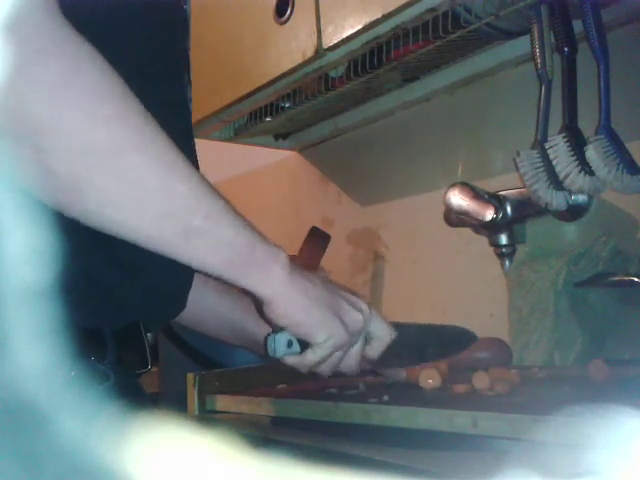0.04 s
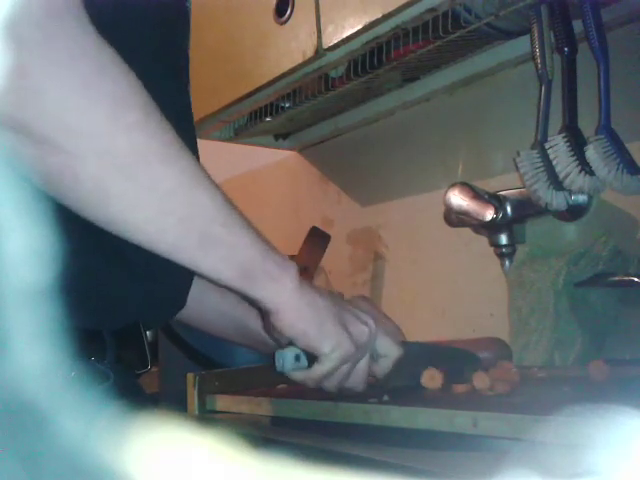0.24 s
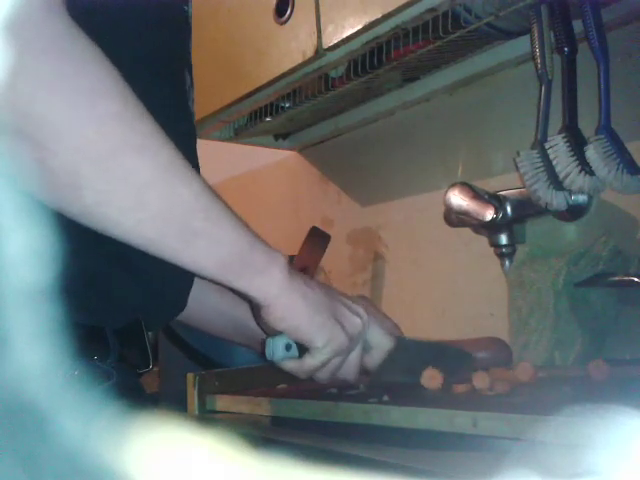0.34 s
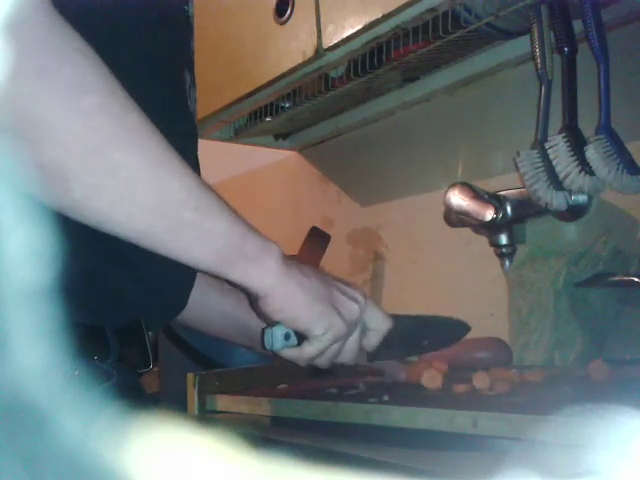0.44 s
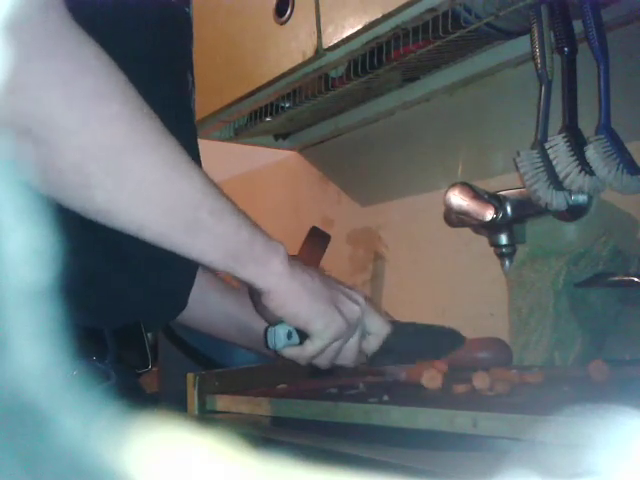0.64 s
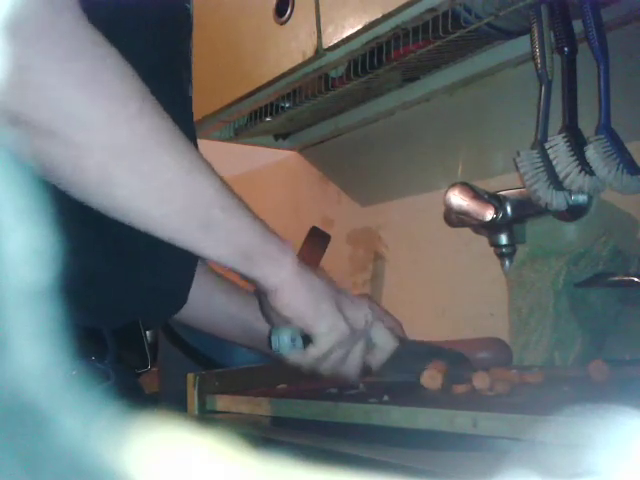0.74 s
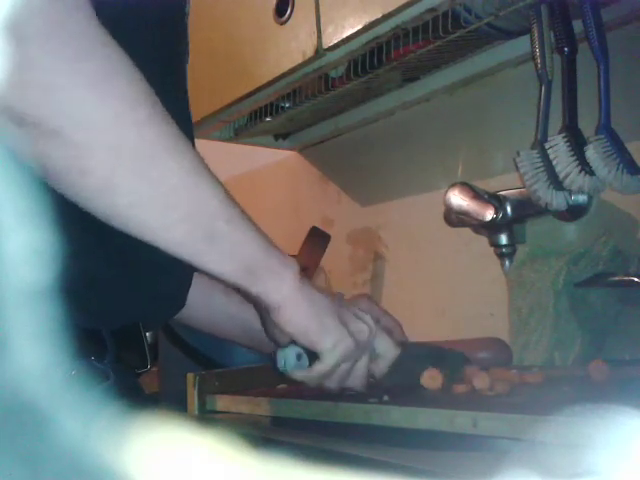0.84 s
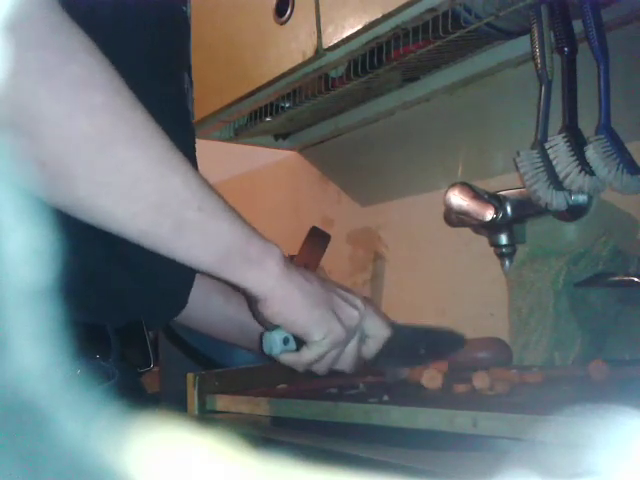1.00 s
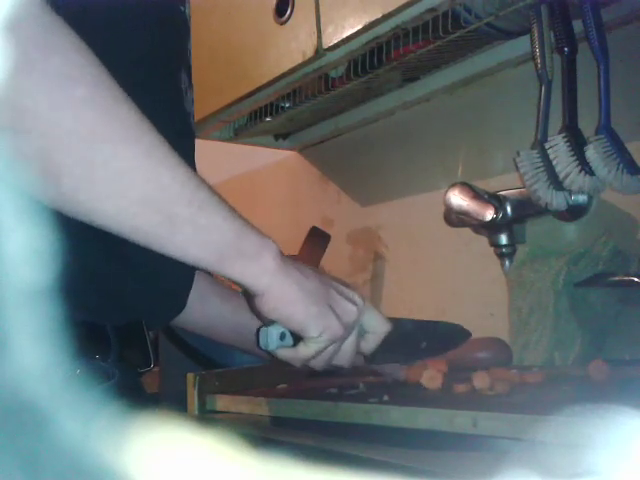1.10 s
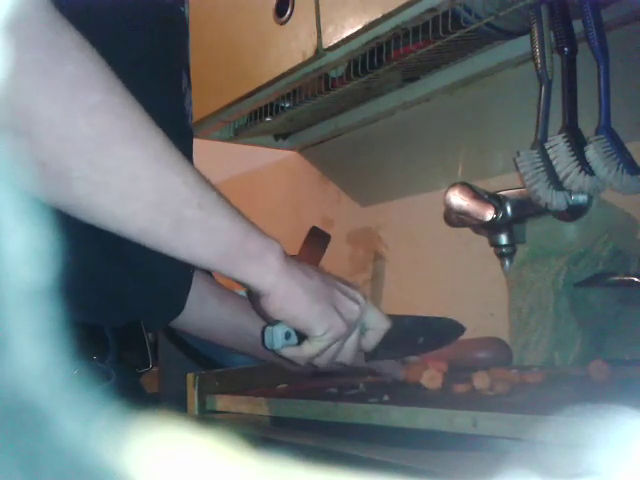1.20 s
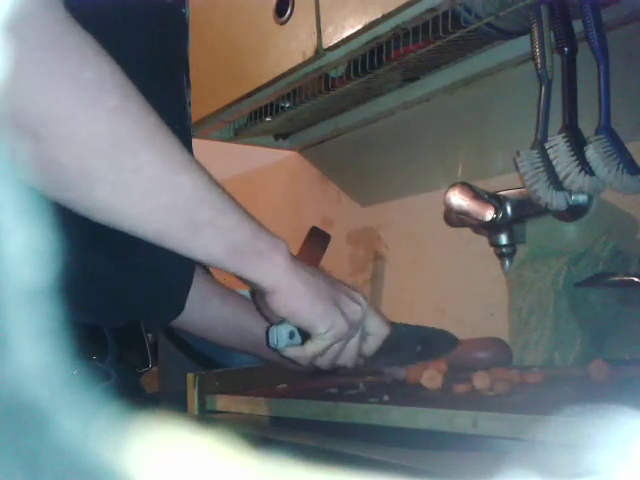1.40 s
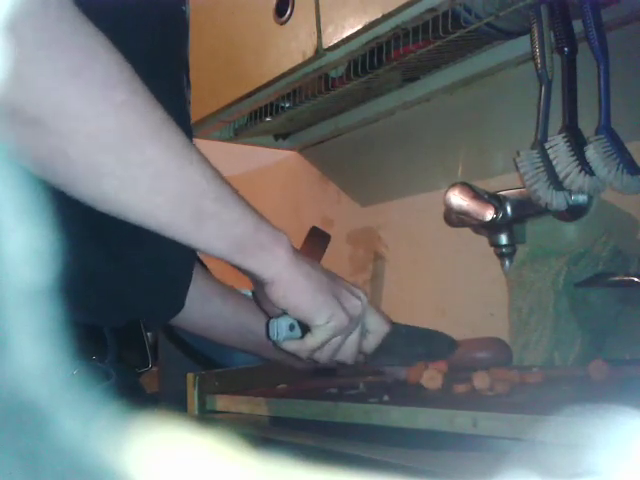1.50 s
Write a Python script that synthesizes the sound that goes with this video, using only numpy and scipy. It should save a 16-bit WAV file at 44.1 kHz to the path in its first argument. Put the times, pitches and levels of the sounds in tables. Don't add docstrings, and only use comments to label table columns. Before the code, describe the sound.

A knife chops carrot twice on a wooden board, each a crisp crunch into a loud woody knock, with faint scrapes and taps between, close in a small reverberant kitchen over very quiet hiss.

```python
import sys
import numpy as np
from scipy import signal
from scipy.io import wavfile

SR = 44100
rng = np.random.default_rng(int(sys.argv[2]) if len(sys.argv) > 2 else 0)


def wrap_up_sound(samples):
    columns = np.atleast_2d(samples).T
    tamed = np.clip(columns, -1, 1)
    steps = np.round(tamed * 32767).astype(np.int16)
    wavfile.write(sys.argv[1], SR, steps)


def linear_from_db(decibels):
    return 10 ** (np.asarray(decibels, float) / 20)


N = 68355
LEAD_S = 0.4

CHOP_S = [
    -.25,
    .2259,
    .8301,
]
CHOP_DB = [-9, -8.5, -8.5]
# pitch in Hz, level in dB, T60 in seconds.
BOARD = [(280, -19, 0.041), (666.4, -0.5, 0.02), (815, -9, 0.038), (1095, -10.5, 0.05), (1387, -7.5, 0.075),
         (2035, -9, 0.033), (2500, -6, 0.017), (3274, -9.5, .015), (3710, -8, 0.023), (4180, -3.5, 0.005),
         (4790, -8.5, 0.045), (5820, -8.5, 0.0043)]
COUNTER_HZ = [80, 140, 232, 385, 454, 542, 584, 738, 794, 1085, 1134, 1299, 1420, 1881]
# level in dB, T60 in seconds.
COUNTER_RINGS = [(-21, .3), (-17.5, 0.24), (-25, .42), (-29, 0.32), (-12.5, .21), (-16.5, 0.35),
                 (-20.5, 0.43), (-24, .22), (-27.5, .22), (-26, .28), (-21.5, 0.2), (-33, 0.094),
                 (-25.5, .25), (-13.5, .3)]
# pitch in Hz, level in dB, T60 in seconds.
RACK = [(3590, -29, .2), (3730, -26, .24), (3790, -24, .25), (3845, -23, .25), (3920, -26, .22),
        (4140, -28, .18), (4750, -30, .18)]
# start in seconds, end in seconds, start level in dB, end level in dB.
CRUNCHES = [
    (0.202, 0.216, -54.5, -40),
    (0.218, 0.232, -32.5, -35.5),
    (0.802, 0.823, -52, -38),
    (.8205, 0.836, -35, -31),
]
SCRAPE_S = [.1, .135, .16, .174, .673, .684, .75, .7655, .783, 1.421, 1.435, 1.489]
SCRAPE_LENGTH_S = [.012, .022, .014, .012, .006, .025, .015, .016, .018, .01, .015, .015]
# level in dB, brightness in dB per octave.
SCRAPE_TONE = [(-59, -0.3), (-60.5, -5), (-62, 1), (-55, 1), (-55, -1.5), (-72, -3.5), (-67, 2.5),
               (-54, -4), (-65.5, -1), (-62, -1.5), (-71, -1), (-72.5, 0.6)]
BLADE_HZ = [3250, 4350, 4750, 5200, 6250, 9000, 14000]
# width in Hz, level in dB.
BLADE_SHAPE = [(251, 0.5), (220, -2.5), (250, -5), (4500, -3), (350, -2.5), (3500, -11.5), (3000, -10)]
# start in seconds, length in seconds, level in dB.
SLIDES = [(0.093, 0.13, -63), (0.169, 0.064, -56.5), (0.546, 0.054, -66.5), (0.676, 0.053, -63.5),
          (0.769, 0.11, -52), (1.418, 0.031, -73.5), (1.478, 0.038, -69.5)]
# time in seconds, level in dB, pitch in Hz.
TAPS = [(.092, -62, 424), (.17, -48.5, 648), (.183, -63.5, 405), (.212, -36, 690), (.553, -55.5, 526),
        (.566, -57.5, 489), (.59, -50.5, 520), (.6, -78, 505), (.775, -50, 623.4), (.79, -71, 450),
        (.817, -67.5, 700), (1.44, -67, 570), (1.49, -57, 556), (1.51, -70, 500)]
# time in seconds, level in dB, pitch in Hz.
THUDS = [(.113, -49.5, 81.4), (.14, -56.5, 95), (.175, -62, 88.3), (.689, -40, 100), (.712, -53, 190),
         (.742, -54, 100), (.762, -54, 93.5), (1.49, -59, 69.1)]
# delay in seconds, level in dB.
ECHOES = [(.001, -2.5), (.0023, -11), (.0043, 0), (.0064, -9.5), (.0105, -2), (.0185, -4.5), (.028, -9)]
# frequency in Hz, level in dB per Hz.
TAIL_COLOUR = [(45, -23.5), (236, -13), (560, -5.5), (1800, -11.5), (2760, -25.5), (3940, -15),
               (7500, -41.5), (15000, -49)]
# frequency in Hz, T60 in seconds.
TAIL_T60 = [(60, 0.28), (200, 0.35), (500, .27), (1500, 0.27), (3000, 0.3), (5000, .24), (8000, .19),
            (14000, 0.093)]
# time in seconds, level in dB.
FRIDGE_SWELL = [(0, -70.5), (.2, -73), (.55, -83), (.75, -84.5), (1.1, -77), (1.3, -76), (1.4, -86),
                (1.55, -82.5)]
# frequency in Hz, level in dB per Hz.
HISS_COLOUR = [(30, -10), (80, -4.5), (350, -2.5), (700, -16.5), (2500, -15), (4500, -19.5), (6500, -23),
               (14000, -24)]


def knock(modes):
    spread_db = 1.5 * rng.standard_normal((len(modes), len(CHOP_S)))
    strength = linear_from_db(CHOP_DB) * linear_from_db(spread_db)
    rings = 0
    for k, (hz, db, t60) in enumerate(modes):
        rings = rings + (-1) ** k * ring(clicks(CHOP_S, linear_from_db(db) * strength[k]), hz, t60)
    return band(rings, 153.3, 4860)


def counter_and_rack():
    swell_s = 0.0033
    t = clock()
    latest = np.clip(np.searchsorted(CHOP_S, t) - 1, 0, None)
    since_chop = np.maximum(t - np.array(CHOP_S)[latest], 0)
    modes = [(hz, *row) for hz, row in zip(COUNTER_HZ, COUNTER_RINGS)]
    return knock([*modes, *RACK]) * (1 - np.exp(-since_chop / swell_s))


def snaps():
    n = len(clock())
    per_second, spread_db = 9000, 3
    happens = rng.random(n) < per_second / SR
    size = linear_from_db(spread_db * np.minimum(rng.exponential(1, n), 4))
    return happens * size * rng.choice([-1, 1], n)


def stroke(s, length, fall):
    t = clock()
    rise = np.clip((t - s) / 0.004, 0, 1)
    return rise * np.exp(-np.maximum(t - s - length, 0) / fall)


def blade():
    t, grains = clock(), snaps()
    crunch = 0
    for start, end, start_db, end_db in CRUNCHES:
        during = (t > start) * (t < end)
        crunch = crunch + during * linear_from_db(np.interp(t, [start, end], [start_db, end_db]))
    strokes = np.array([stroke(s, length, 0.005) for s, length in zip(SCRAPE_S, SCRAPE_LENGTH_S)])
    level_db, tilt = np.transpose(SCRAPE_TONE)
    out = 0
    for k, (hz, (width, db)) in enumerate(zip(BLADE_HZ, BLADE_SHAPE)):
        t60 = np.log(1000) / np.pi / width
        scrape = linear_from_db(level_db + tilt * np.log2(hz / 4000)) @ strokes
        gain = linear_from_db(db) / ring(grains, hz, t60).std() / 2
        out = out + (-1) ** k * gain * ring((crunch + scrape) * grains, hz, t60)
    return 0.27 * out + high_pass(out, 2430)


def slides():
    rub = rms_one(band(snaps(), 217, 684))
    return rub * sum(linear_from_db(db) * stroke(s, length, 0.01) for s, length, db in SLIDES)


def bumps(rows, t60):
    rings = 0
    for s, db, hz in rows:
        push = smooth(smooth(clicks([s], linear_from_db(db)), hz), hz)
        rings = rings + 2 * ring(push, hz, t60)
    return high_pass(rings, 60)


def near_walls(x):
    echoes = sum((-1) ** k * linear_from_db(db) * np.roll(x, int(s * SR)) for k, (s, db) in enumerate(ECHOES))
    return x + echoes


def dip(x):
    hz, width_hz, share = 956, 140, 0.82
    cut = signal.lfilter(*signal.iirnotch(hz, hz / width_hz, fs=SR), x)
    return x + share * (cut - x)


def room(small):
    tail_db, small_db = -4, -37
    late_db, late_stretch, late_top_hz = -26.5, 2.175, 3500
    build_s, build_cycles = 0.0026, 0.71
    hz, bands = noise_bands(SR)
    column_hz = hz[:, None]
    t, t60 = np.arange(SR) / SR, at_hz(TAIL_T60, hz)
    early = linear_from_db(-60 * t / t60)
    late = linear_from_db(late_db - 60 * t / t60 / late_stretch) / (1 + (column_hz / late_top_hz) ** 2)
    build = 1 - np.exp(-t / (build_s + build_cycles / column_hz))
    fade = (early + late) * build
    woody = linear_from_db(at_hz(TAIL_COLOUR, hz)) * bands
    woody = (woody * fade).sum(axis=0) / woody.sum(axis=0).std()
    plain = (bands * fade).sum(axis=0)
    chops = clicks(CHOP_S, linear_from_db(CHOP_DB) * linear_from_db(tail_db))
    wet = signal.fftconvolve(chops, dip(woody)) + linear_from_db(small_db) * signal.fftconvolve(small, plain)
    return wet[:len(small)]


def fridge():
    t = clock()
    thin_hiss = rms_one(ring(rng.standard_normal(len(t)), 4800, 0.0034))
    hum = linear_from_db(2.5) * np.sin(2 * np.pi * 100 * t)
    return linear_from_db(np.interp(t, *np.transpose(FRIDGE_SWELL))) * (thin_hiss + hum)


def steady_hiss():
    hz, bands = noise_bands(len(clock()))
    return linear_from_db(-74) * rms_one((linear_from_db(at_hz(HISS_COLOUR, hz)) * bands).sum(axis=0))


def clock():
    return np.arange(N + int(LEAD_S * SR)) / SR - LEAD_S


def clicks(s, gains):
    out = np.zeros(len(clock())) + 1e-18
    out[((np.asarray(s) + LEAD_S) * SR).astype(int)] = gains
    return out


def ring(x, hz, t60):
    r, w = linear_from_db(-60 / (t60 * SR)), 2 * np.pi * hz / SR
    return signal.lfilter([0, np.sin(w)], [1, -2 * r * np.cos(w), r * r], x)


def smooth(x, hz):
    r = np.exp(-2 * np.pi * hz / SR)
    return signal.lfilter([1 - r], [1, -r], x)


def band(x, low_hz, high_hz):
    return signal.sosfilt(signal.butter(2, [low_hz, high_hz], "band", fs=SR, output="sos"), x)


def high_pass(x, hz):
    return signal.sosfilt(signal.butter(2, hz, "high", fs=SR, output="sos"), x)


def rms_one(x):
    return x / np.sqrt(np.mean(x ** 2) + 1e-20)


def noise_bands(size):
    edges = 25 * 2 ** np.arange(0, 9.5, 1 / 3)
    white = rng.standard_normal((2, size))
    bands = [band(white[k % 2], edges[k], edges[k + 1]) for k in range(len(edges) - 1)]
    return np.sqrt(edges[1:] * edges[:-1]), np.array(bands)


def at_hz(points, hz):
    point_hz, value = np.transpose(points)
    return np.interp(np.log(hz), np.log(point_hz), value)[:, None]


def scene():
    chops = near_walls(knock(BOARD)) + counter_and_rack()
    taps, thuds = bumps(TAPS, 0.035), bumps(THUDS, 0.095)
    small = blade() + slides() + taps + thuds
    mix = chops + small + room(small) + fridge() + steady_hiss()
    return mix[None, -N:]


def roll_off(x):
    return signal.sosfilt(signal.butter(12, 15610, fs=SR, output="sos"), x)


def record(dry):
    squeezed = np.tanh(dry)
    mix = signal.sosfilt(signal.cheby2(16, 50, 15600, fs=SR, output="sos"), squeezed)
    return roll_off(mix)


dry = scene()
out = record(dry)
wrap_up_sound(out)
```